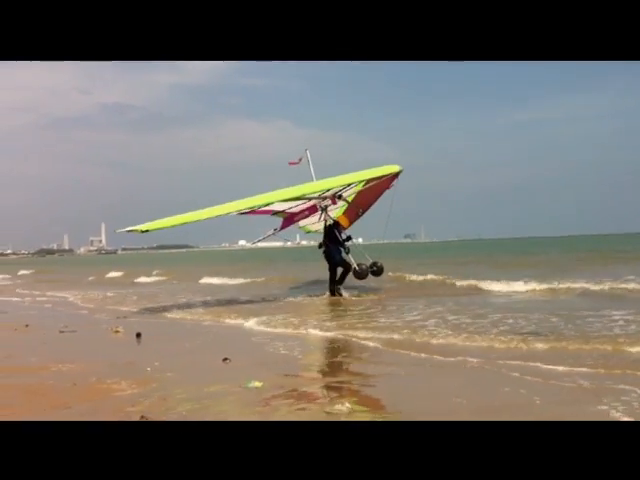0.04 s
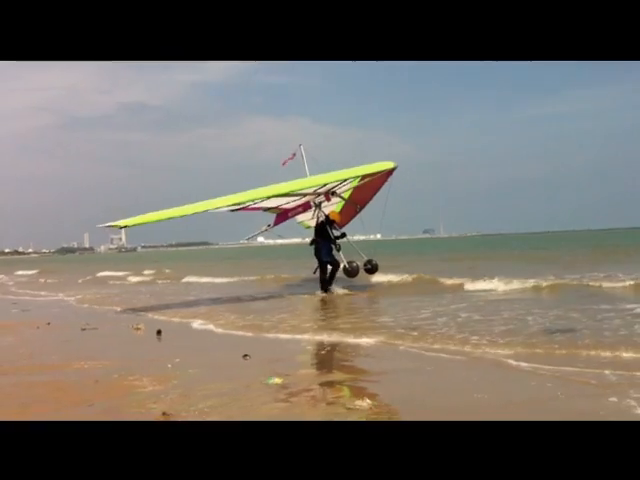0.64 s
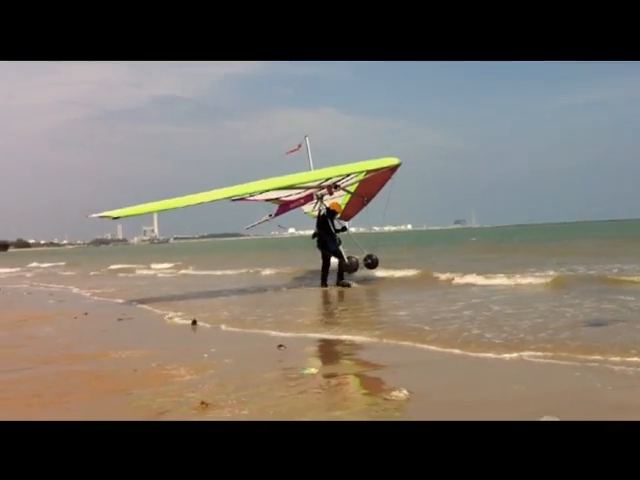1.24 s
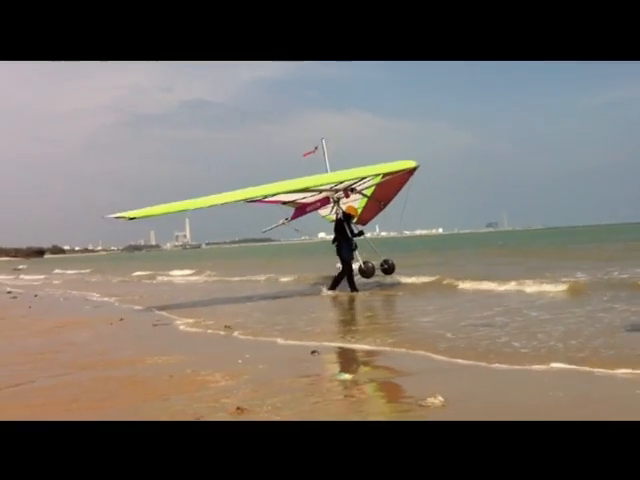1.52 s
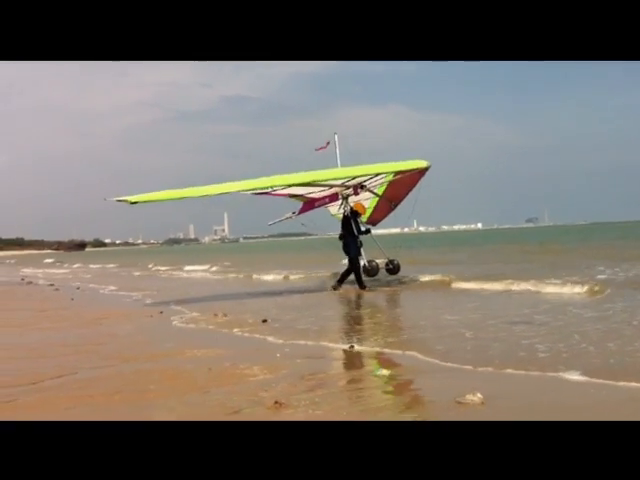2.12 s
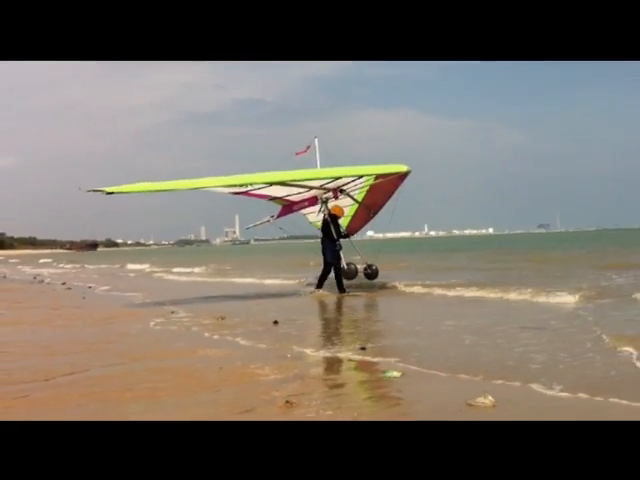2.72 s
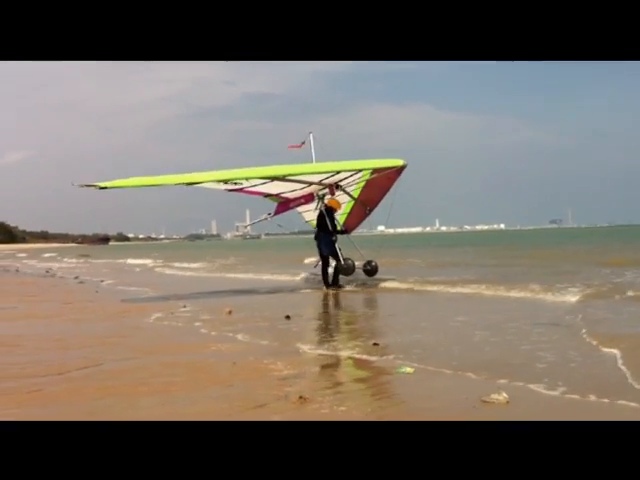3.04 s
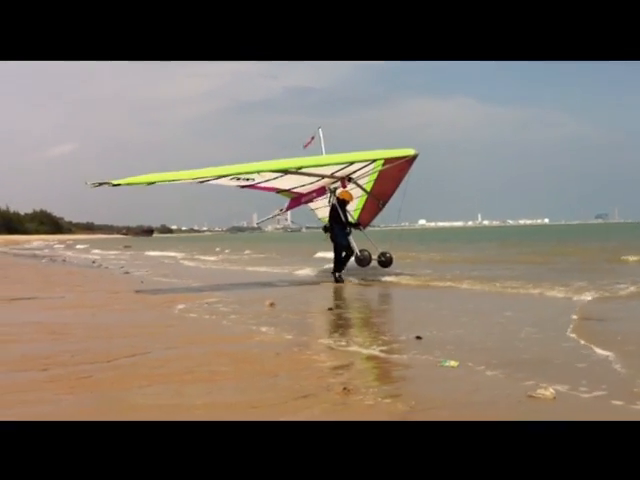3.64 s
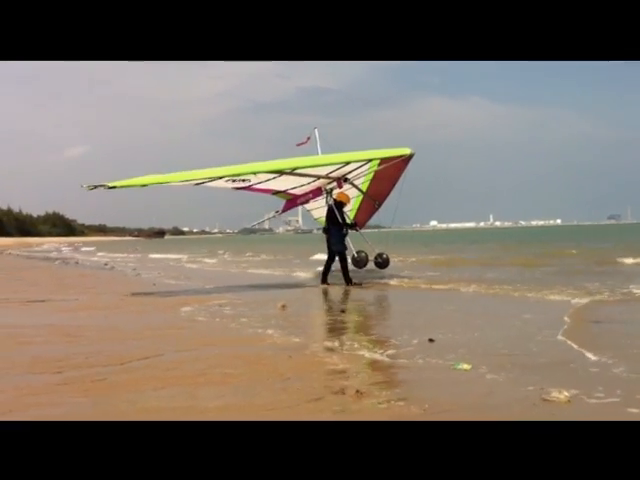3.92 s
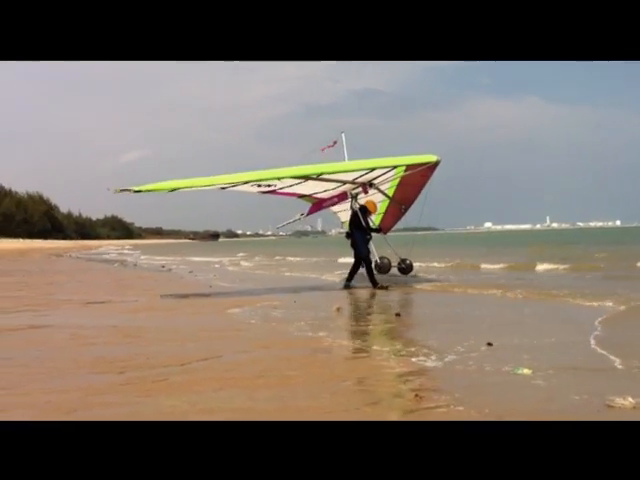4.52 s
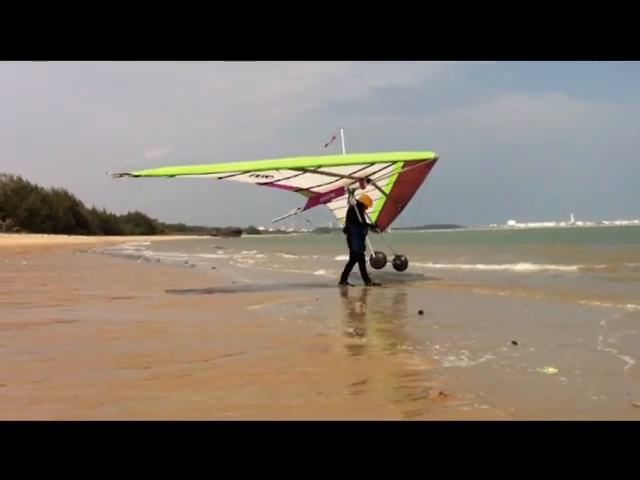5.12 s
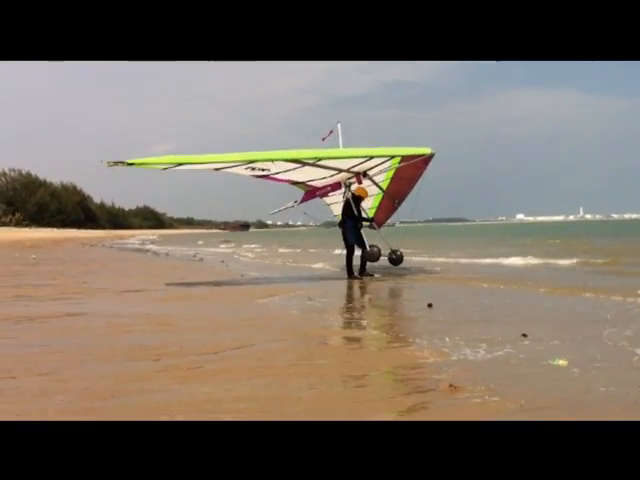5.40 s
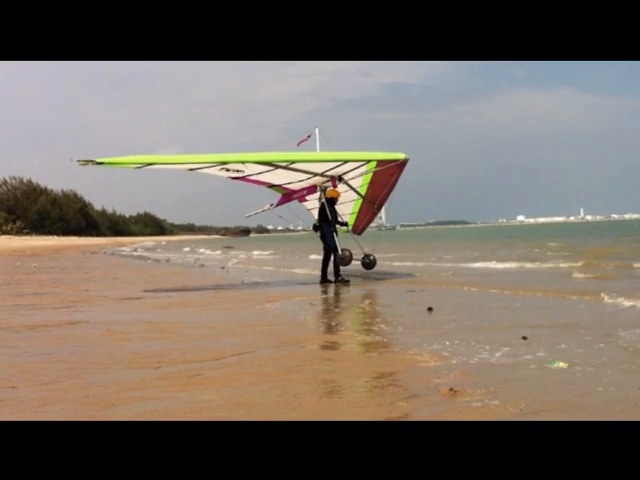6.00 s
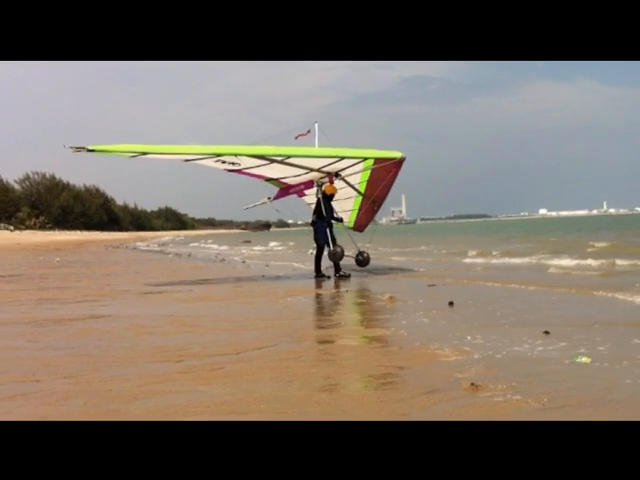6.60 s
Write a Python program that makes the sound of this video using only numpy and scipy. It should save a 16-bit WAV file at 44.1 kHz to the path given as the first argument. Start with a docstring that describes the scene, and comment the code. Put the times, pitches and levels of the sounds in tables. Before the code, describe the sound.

Small waves wash continuously onto a sandy shore, with a fine hiss of foam on top. From start to end, wind buffets the microphone in dull, irregular bumps, the hardest coming early. The surf rises gently several times and once more at the end, while the fizz gradually builds and a few nearby bubbles pop faintly.

```python
"""An open beach in a sea breeze. From the start, turbulent eddies buffet the microphone in short low
thuds, the harder ones louder and brighter, over the steady wash of countless bubbles in the surf.
The steepest eddy front slaps at 0.37 s. From 1.6 s on, a near bubble now and then bursts with a tick.
Small waves swell at 1.8, 3 and 5 s and again at the end, while the fizz of foam on the sand slowly grows."""
import sys
import numpy as np
from scipy import signal
from scipy.fft import rfft, irfft
from scipy.io import wavfile
from scipy.ndimage import uniform_filter1d, map_coordinates

SR = 44100
rng = np.random.default_rng(int(sys.argv[2]) if len(sys.argv) > 2 else 0)


def transcribe(signal):
    """Save signal, clipped to [-1, 1], as a 16-bit WAV file at the path in sys.argv[1]."""
    frames = np.atleast_2d(signal).T
    limited = np.clip(frames, -1, 1)
    pcm = np.round(limited * 32767).astype(np.int16)
    wavfile.write(sys.argv[1], SR, pcm)


N = 297675
T = np.arange(N) / SR

# spectrum of bursting foam: (f/Hz, relative level/dB)
FIZZ_SPECTRUM = [(4000, -15), (5300, -8.5), (6500, -3), (8200, -0.5), (9500, -4), (12000, -31)]


def wind(breeze_hz=199.86, gust_hz=238.8, brighten=0.95, firmness=0.94):
    """Convected turbulence: the faster the flow sweeps past the microphone port, the higher its spectrum."""
    # eddies that hit the port: (t/s, relative peak level/dB, half-length/s, centre f/Hz)
    buffets = [(0.188, -32.0, 0.016, 188.5), (0.273, -29.0, 0.015, 241.3), (0.371, -17.0, 0.0092, 269),
               (0.46, -30.0, 0.023, 250.7), (0.665, -29, 0.011, 188.8), (0.705, -28.0, 0.019, 239.5),
               (0.758, -33.0, 0.01, 210), (0.802, -33, 0.0096, 200.7), (0.851, -26.5, 0.023, 219.6),
               (0.951, -24.0, 0.023, 230.5), (1.035, -26, 0.011, 181.2), (1.197, -20.0, 0.014, 260.6),
               (1.222, -19.5, 0.0072, 203), (1.298, -26, 0.009, 199.4), (1.38, -20.5, 0.0095, 291.2),
               (1.493, -27, 0.018, 180.6), (1.528, -30.5, 0.014, 179), (1.687, -24.5, 0.008, 239.7),
               (1.849, -30, 0.0095, 200.3), (1.912, -30.0, 0.014, 178.6), (1.974, -30.5, 0.026, 220),
               (2.083, -23.5, 0.024, 231.4), (2.155, -24.0, 0.042, 269.4), (2.357, -25.5, 0.0077, 210.3),
               (2.394, -26.0, 0.019, 199), (2.467, -33.0, 0.011, 211.4), (2.493, -30.0, 0.014, 229.7),
               (2.614, -31.5, 0.01, 244), (2.747, -26.5, 0.011, 281.4), (2.792, -30.5, 0.019, 280.5),
               (2.85, -24.5, 0.013, 199.4), (2.881, -27.0, 0.018, 229.2), (3.031, -27.5, 0.024, 221),
               (3.078, -24.5, 0.0089, 230.2), (3.154, -31.0, 0.013, 279.8), (3.26, -26.5, 0.015, 209.6),
               (3.319, -24.5, 0.034, 220.3), (3.398, -27.5, 0.035, 249), (3.442, -29, 0.017, 240.6),
               (3.537, -23.5, 0.044, 219.4), (3.622, -29.5, 0.018, 230.2), (3.691, -25.0, 0.0091, 199.8),
               (3.739, -25.0, 0.013, 249.9), (3.77, -30.0, 0.012, 232.4), (3.814, -23.0, 0.019, 229.3),
               (3.851, -30, 0.0094, 218), (3.986, -23.5, 0.011, 268.6), (4.009, -22, 0.0078, 347.5),
               (4.037, -22, 0.024, 221), (4.158, -21.5, 0.025, 259.6), (4.195, -23.0, 0.0058, 210.3),
               (4.22, -31.5, 0.012, 219.3), (4.275, -26.5, 0.0087, 228.6), (4.369, -29.5, 0.0079, 179.3),
               (4.41, -25.5, 0.0081, 261), (4.47, -29.5, 0.019, 219.4), (4.553, -29.5, 0.0094, 180.3),
               (4.596, -26.5, 0.022, 249.3), (4.661, -25.5, 0.018, 249), (4.739, -32.5, 0.013, 200.3),
               (4.77, -31.5, 0.0163, 218.5), (4.799, -32.5, 0.013, 190.4), (4.864, -22, 0.022, 321.7),
               (4.901, -23.5, 0.0094, 260), (4.93, -21.5, 0.014, 260), (4.978, -24.5, 0.013, 289.6),
               (5.078, -18.5, 0.013, 300.2), (5.118, -24.5, 0.013, 271), (5.154, -33.5, 0.0085, 240.4),
               (5.178, -28, 0.0088, 190), (5.209, -21.5, 0.011, 249.3), (5.234, -27.5, 0.0098, 180.3),
               (5.268, -32.0, 0.017, 300.4), (5.356, -24.5, 0.014, 248.7), (5.466, -22.0, 0.029, 271.7),
               (5.53, -32.5, 0.012, 230), (5.592, -26.5, 0.026, 239.2), (5.685, -32.5, 0.032, 241.3),
               (5.734, -28.5, 0.016, 260.6), (5.813, -34, 0.019, 210.7), (5.919, -33, 0.017, 210),
               (6.012, -32, 0.01, 240.6), (6.081, -32, 0.015, 219.1), (6.214, -20.5, 0.013, 279.5),
               (6.25, -33, 0.0097, 190.7), (6.339, -28, 0.012, 240.9), (6.371, -26.5, 0.022, 231.3),
               (6.452, -34, 0.011, 189.5), (6.49, -29.5, 0.013, 180.3), (6.678, -23.5, 0.0089, 308)]
    # breeze between the eddies: (t/s, relative level/dB)
    breeze_levels = [(0, -41), (.2, -39.5), (.33, -47), (.43, -40), (.56, -47), (.78, -43), (.9, -43),
                     (1.08, -47), (1.28, -34), (1.42, -46), (1.58, -52.5), (1.65, -38.5), (1.77, -45),
                     (1.88, -40), (2.28, -39), (2.45, -39.5), (2.62, -42), (2.9, -36), (3.22, -39.5),
                     (3.45, -39), (3.85, -35), (4.1, -37), (4.5, -39.5), (4.9, -43), (5.02, -48),
                     (5.15, -35.5), (5.65, -43), (5.87, -45), (5.97, -39), (6.04, -48.5), (6.11, -38.5),
                     (6.45, -39.5), (6.75, -36.5)]
    # pressure spectrum of a moderate gust, centred near gust_hz: (f/Hz, relative level/dB)
    gust_spectrum = [(20, -23), (80, -5.5), (165, 4.5), (250, -1), (420, -12), (620, -20.5), (900, -31),
                     (1500, -56), (3000, -85)]
    flutter = undb(-3.5 + 3.0 * walk(28)) ** 2
    power = undb(curve(breeze_levels)) ** 2 * (flutter + small_eddies())
    weighted_hz = power * breeze_hz
    for s, db, half, hz in buffets:
        buffet = eddies([(s, db + 0.33, half)])
        power = power + buffet
        weighted_hz = weighted_hz + buffet * hz
    pace = (weighted_hz / power / gust_hz) ** brighten
    swirls = colour(rng.standard_normal(2 * N), gust_spectrum)
    pressure = map_coordinates(swirls, [np.cumsum(pace)], order=3, mode="wrap")
    # the small microphone passes little of the deepest pressure swings
    pressure = butterworth(pressure, "high", order=2, hz=148)
    # the finest swirls cancel across the port, so even hard gusts stay dull
    pressure = butterworth(pressure, "low", order=4, hz=866)
    # the force of each eddy follows the air speed more than chance
    pressure = unit(pressure / smooth(pressure ** 2, seconds=0.012) ** (firmness / 2))
    force = np.sqrt(power) * undb(1.73 * walk(160))
    return butterworth(pressure * force, "high", order=2, hz=89.5)


def eddies(rows, lean=0.1433):
    """Incoherent sources add in power: each (t/s, level/dB, half-length/s) swells, then fades more slowly."""
    power = np.zeros(N)
    for s, db, half in rows:
        near = slice(*np.searchsorted(T, [s - 4 * half, s + 4 * half]))
        offset = T[near] - s
        passing = offset / (half * (1 + lean * np.sign(offset)))
        power[near] += undb(db) ** 2 * np.exp(-2 * passing ** 2)
    return power


def small_eddies(per_s=16, over_breeze_db=3, scatter_db=1.5, half_s=0.012):
    """Intermittency: small eddies follow loosely, no two alike; their power is relative to the breeze."""
    late, strength, length = rng.standard_normal(size=(160, 3)).T
    times = (np.arange(len(late)) + 0.5 * late) / per_s
    return eddies(zip(times, over_breeze_db + scatter_db * strength, half_s * np.exp(0.305 * length)))


def slaps():
    """Time-frequency reciprocity: the steeper an eddy front, the shorter and higher its pressure pulse."""
    # fronts that slap the port: (t/s, peak level/dB, centre f/Hz)
    fronts = [(.271, -26.5, 370), (.3695, -14, 600), (.374, -15.5, 377), (.704, -28, 480), (.951, -19, 613),
              (.963, -26, 605), (1.202, -22, 360), (1.381, -16, 478.5), (1.687, -25, 380),
              (3.247, -23, 522), (4.011, -18, 519.6), (4.177, -18, 380), (4.849, -19, 350.7),
              (4.863, -19, 500), (5.357, -21, 500), (6.213, -14, 497), (6.677, -15.5, 420.2)]
    pressure = np.zeros(N)
    for s, db, hz in fronts:
        spread = (np.pi * hz * (T - s)) ** 2
        # one pulse with an opposite lobe on either side
        pressure -= undb(db) * (1 - 2 * spread) * np.exp(-np.minimum(spread, 50))
    return pressure


def surf():
    """Smaller bubbles sound higher: breakers roar, the wash runs up the sand, the finest foam hisses."""
    # spectra of breakers, running foam, spray and the finest bubbles: (f/Hz, relative level/dB)
    roar_spectrum = [(60, -15.5), (150, 3), (350, -4.5), (700, -3.5), (1100, -2.5), (1500, -3.5),
                     (2200, -12), (4000, -31.5)]
    wash_spectrum = [(700, -30), (1300, -9), (1700, -2.5), (2050, -1.15), (2600, -3), (3400, -7),
                     (4200, -12), (5100, -21.5), (7000, -29)]
    spray_spectrum = [(7500, -21), (9500, -3), (10500, 0.5), (11500, -1.5), (12400, -11), (14000, -15),
                      (15500, -28)]
    mist_spectrum = [(9500, -22), (12000, -1), (13000, -1), (14000, 1), (15000, -18), (15600, -18)]
    # spray, strongest while the foam edge runs close by: (t/s, level/dB)
    spray_levels = [(0, -55), (1.3, -53), (2.4, -54.5), (4.2, -56.5), (6.75, -57)]
    roar_db = wave_swell(base_db=-41.5, follow=0.75, drift_db_per_s=-0.06)
    wash_db = wave_swell(base_db=-41.5, follow=0.99, drift_db_per_s=0.04)
    fizz_db = wave_swell(base_db=-52.5, follow=0.56, drift_db_per_s=0.42)
    mist_db = wave_swell(base_db=-61.5, follow=0.6, drift_db_per_s=0.17)
    roar = water(roar_spectrum, roar_db, grain=0.21, per_s=1000, churn_db=0.78)
    wash = water(wash_spectrum, wash_db, grain=0.36, per_s=1500, churn_db=0.6)
    fizz = water(FIZZ_SPECTRUM, fizz_db, grain=0.43, per_s=1400, churn_db=0.68)
    spray = water(spray_spectrum, curve(spray_levels), grain=0.5, per_s=1600, churn_db=0.7)
    mist = water(mist_spectrum, mist_db, grain=0.5, per_s=1500, churn_db=0.5)
    return roar + wash + wash_peak() + fizz + spray + mist


def water(spectrum, level_db, grain, per_s, churn_db):
    """Superposition: far bubbles merge to Gaussian noise, nearer ones stand out; two foam patches churn."""
    patches = 0
    for _ in range(2):
        rush = rng.standard_normal(N) + grain * bubbles(per_s)
        patches = patches + rush * undb(churn_db * (walk(6) + walk(22)))
    return colour(patches, spectrum) * undb(level_db)


def bubbles(per_s, spread_db=5.5):
    """Shot noise: tiny bursts come independently of each other, a few much larger than the rest."""
    bursts = rng.random(N) < per_s / SR
    size = undb(spread_db * np.minimum(rng.exponential(size=N), 4))
    return unit(bursts * size * rng.standard_normal(N))


def wave_swell(base_db, follow, drift_db_per_s):
    """Amplitude modulation: level/dB swells with each wave, drifts as the microphone turns along shore."""
    # small breaking waves: (crest t/s, swell level/dB at follow = 1, half-length/s)
    waves = [(1.786, 2, 0.49), (3.0, 0.9, 0.33), (5.02, 1.5, 0.21), (6.75, 2, 0.82)]
    swell = sum(db * np.exp(-((T - s) / half) ** 2) for s, db, half in waves)
    return base_db + follow * swell + drift_db_per_s * T


def wash_peak(start_hz=1792, climb_hz_per_s=55, width_hz=370):
    """Narrow-band noise: a soft peak in the wash climbs as the microphone turns along the shore."""
    rush = rng.standard_normal(N) + 1j * rng.standard_normal(N)
    envelope = butterworth(rush, "low", order=2, hz=width_hz / 2)
    cycles = np.cumsum(start_hz + climb_hz_per_s * T) / SR
    band = unit((envelope * np.exp(2j * np.pi * cycles)).real)
    return band * undb(wave_swell(base_db=-53, follow=2.2, drift_db_per_s=0.06))


def foam_ticks(decay_s=0.0017):
    """Damped transients: a near bubble bursts with a bright tick that dies away exponentially."""
    # near bursts: (t/s, level/dB)
    bursts = [(1.635, -42), (2.299, -38), (3.849, -38), (3.946, -35), (6.622, -35)]
    envelope = np.zeros(N)
    for s, db in bursts:
        envelope += undb(db) * (T >= s) * np.exp(-np.abs(T - s) / decay_s)
    return envelope * colour(rng.standard_normal(N), FIZZ_SPECTRUM)


def undb(db):
    """Level in decibels to amplitude ratio."""
    return 10 ** (np.asarray(db) / 20)


def curve(rows):
    """Linear interpolation of (t/s, level/dB) points."""
    return np.interp(T, *np.transpose(rows))


def unit(x):
    """Normalisation to rms 1."""
    return x / np.std(x)


def colour(x, points):
    """Spectral shaping by (f/Hz, relative level/dB) points, at rms 1."""
    hz, db = np.transpose(points)
    f = np.maximum(np.fft.rfftfreq(len(x), 1 / SR), 1)
    gain = undb(np.interp(np.log(f), np.log(hz), db))
    return unit(irfft(rfft(x) * gain, len(x)))


def butterworth(x, kind, order, hz):
    """Maximally flat low-pass or high-pass filter."""
    return signal.sosfilt(signal.butter(order, hz, kind, fs=SR, output="sos"), x)


def smooth(x, seconds):
    """Triangular running mean."""
    width = max(int(seconds * SR), 1)
    return uniform_filter1d(uniform_filter1d(x, width), width)


def walk(per_s):
    """Random fluctuation of spread 1, changing about per_s times a second."""
    steps = rng.standard_normal(2048)
    held = steps[(T * per_s).astype(int) % len(steps)]
    return unit(smooth(held, 0.5 / per_s))


def scene():
    """Linear superposition: the pressures of wind and sea add at one microphone."""
    return (wind() + slaps() + surf() + foam_ticks())[None]


def record(dry, top_hz=15700):
    """Band limiting: a steep elliptic low-pass cuts the highest treble."""
    return signal.sosfilt(signal.ellip(10, 0.2, 80, top_hz, fs=SR, output="sos"), dry)


dry = scene()
out = record(dry)
transcribe(out)
```